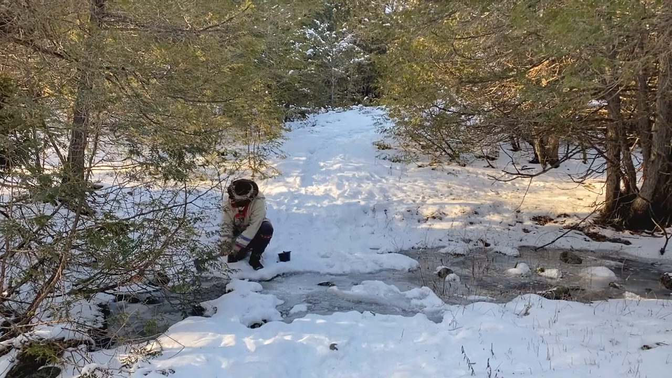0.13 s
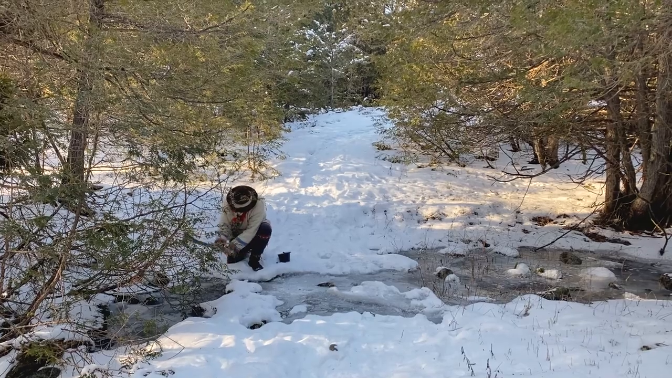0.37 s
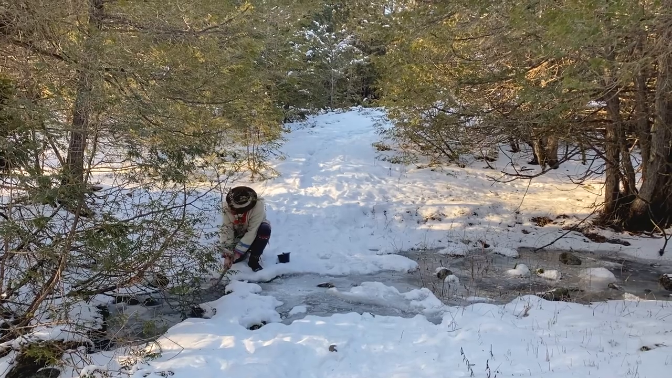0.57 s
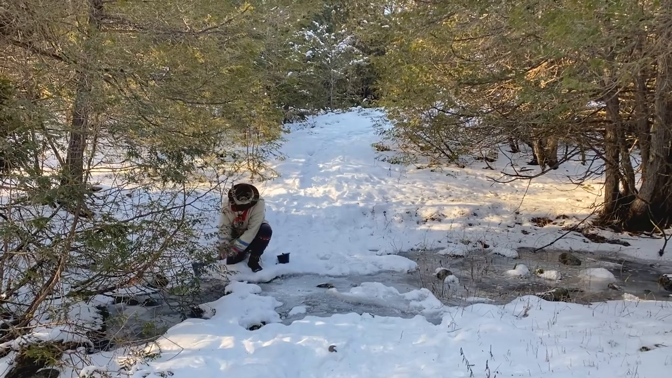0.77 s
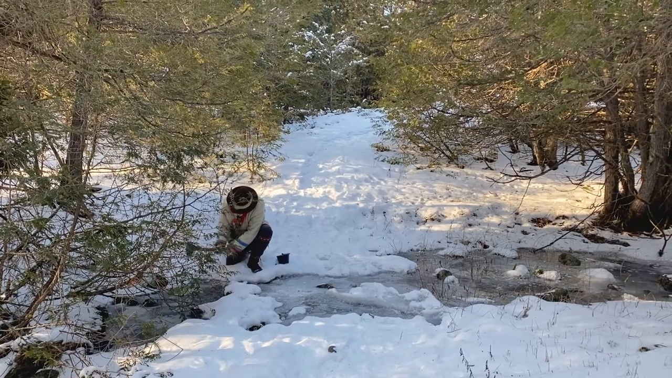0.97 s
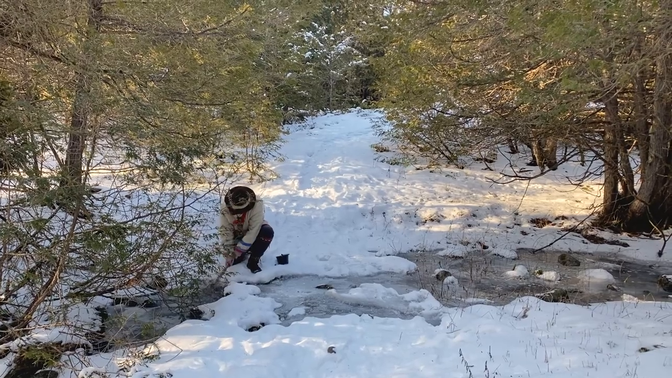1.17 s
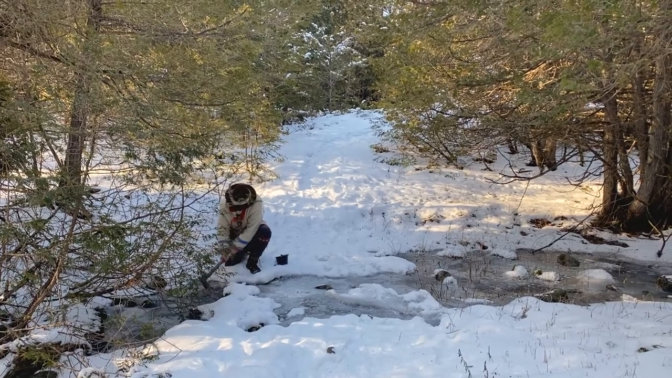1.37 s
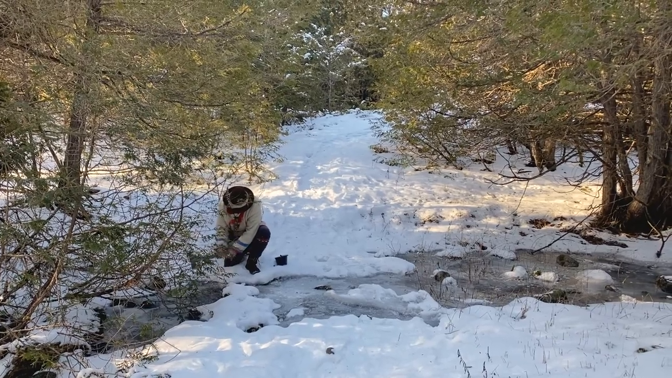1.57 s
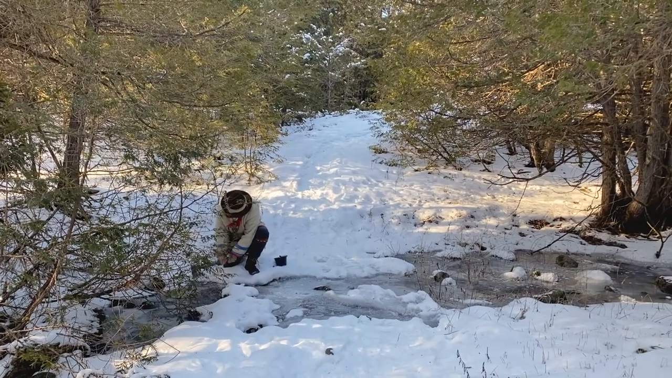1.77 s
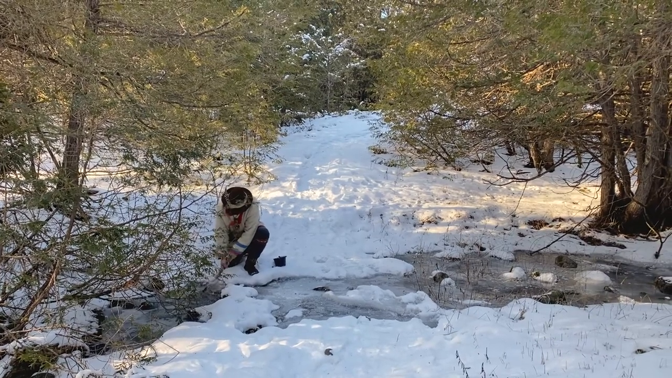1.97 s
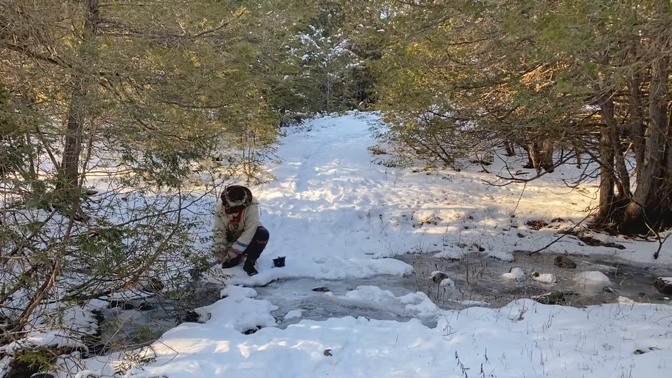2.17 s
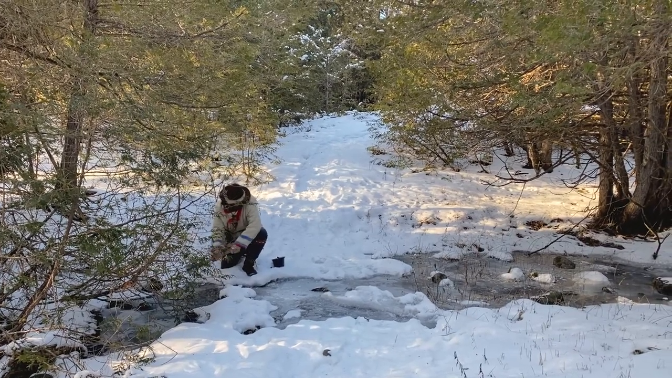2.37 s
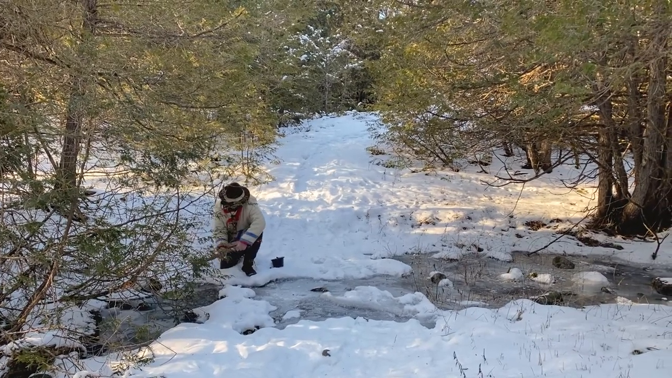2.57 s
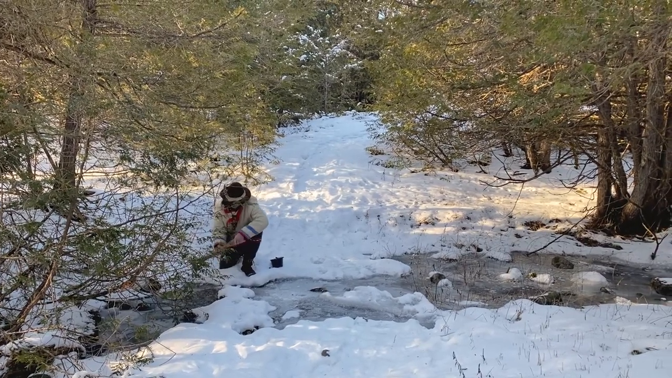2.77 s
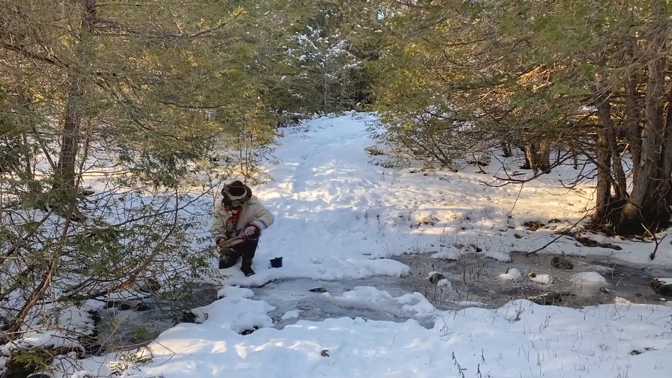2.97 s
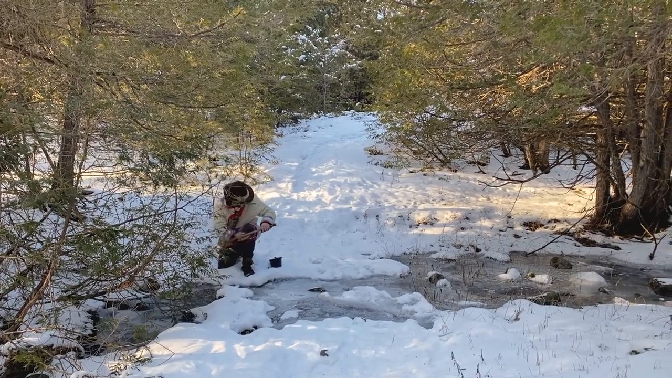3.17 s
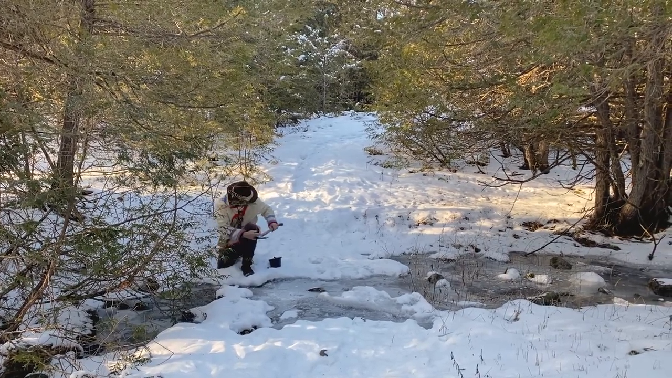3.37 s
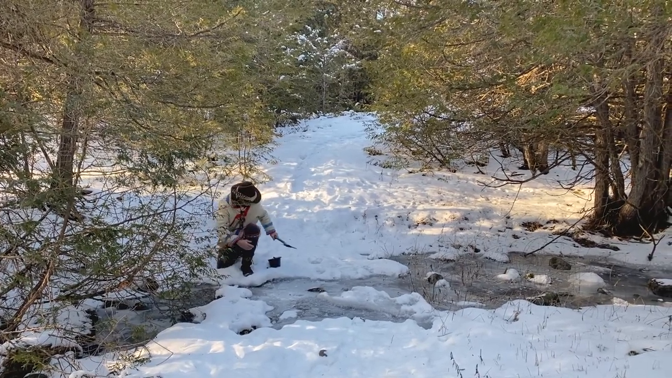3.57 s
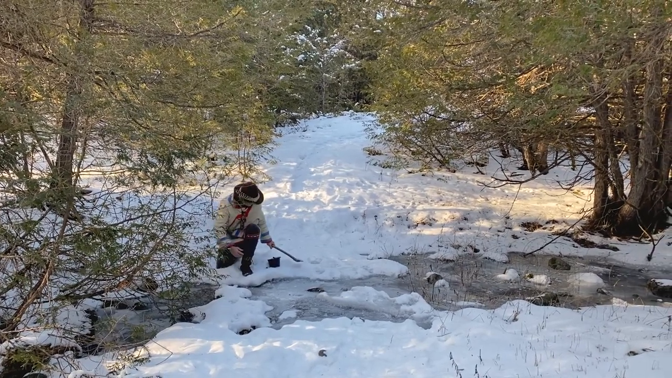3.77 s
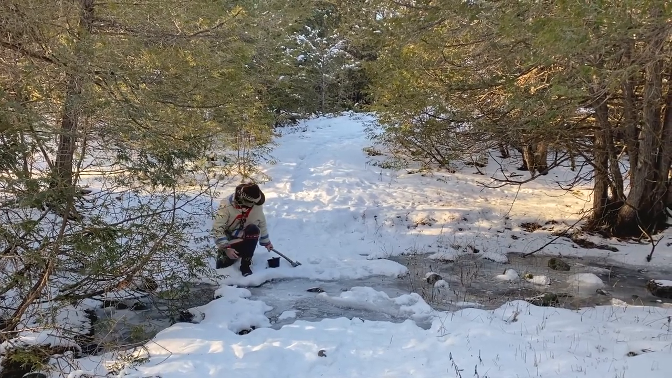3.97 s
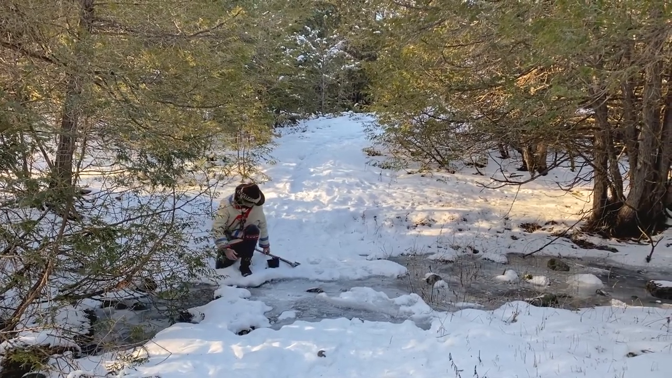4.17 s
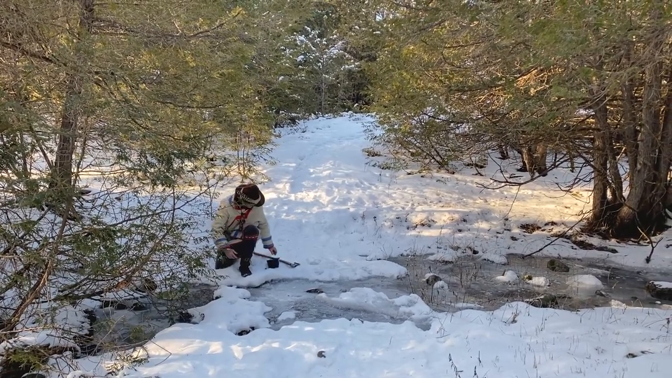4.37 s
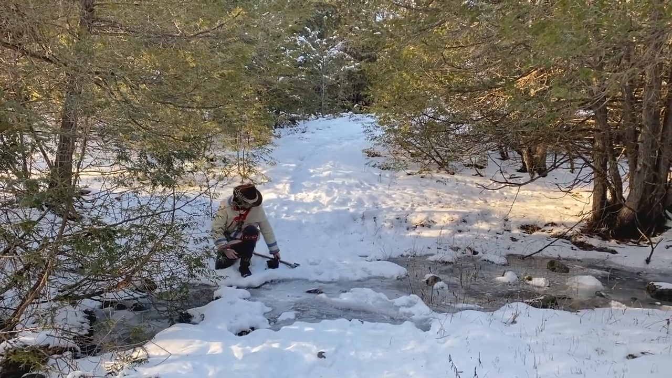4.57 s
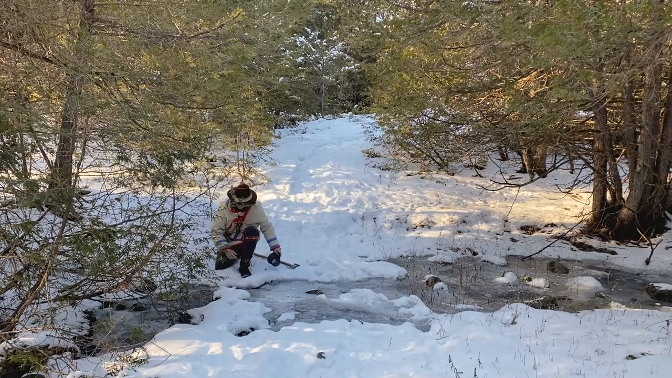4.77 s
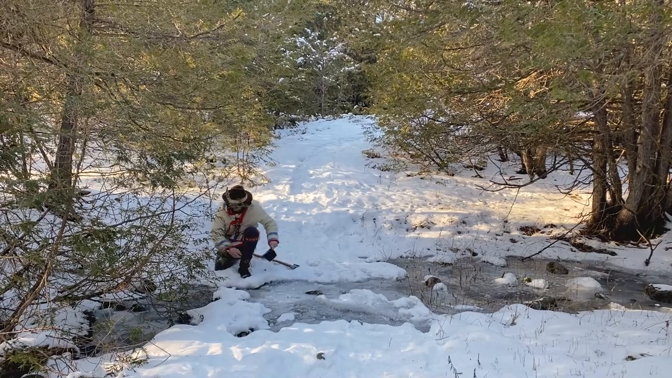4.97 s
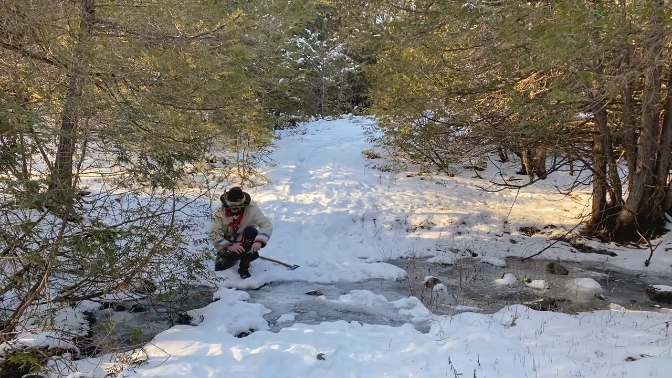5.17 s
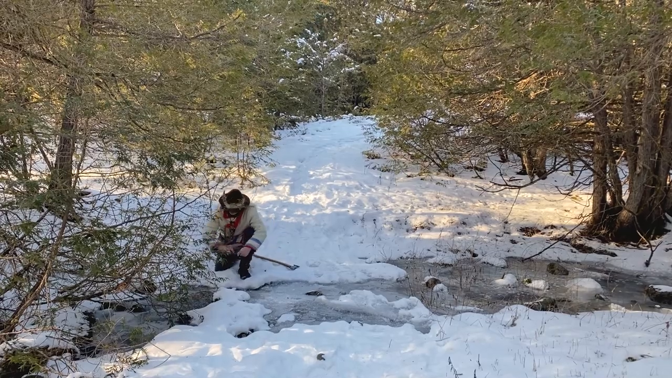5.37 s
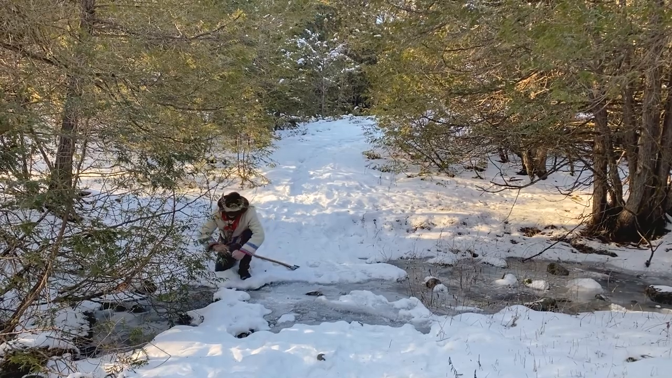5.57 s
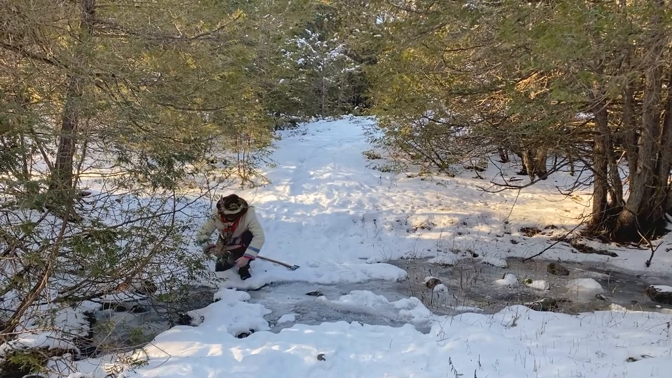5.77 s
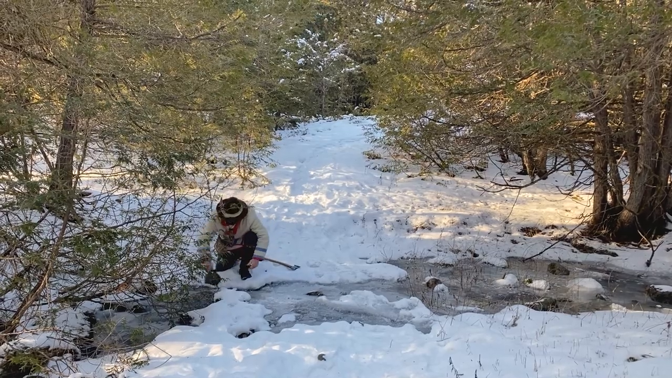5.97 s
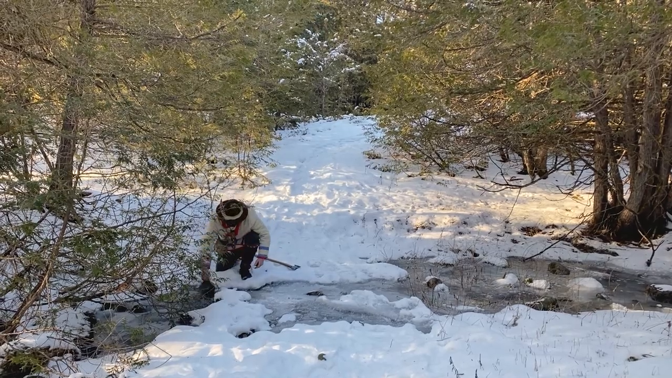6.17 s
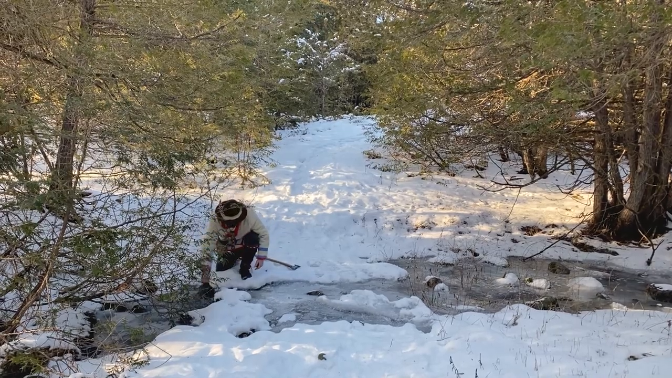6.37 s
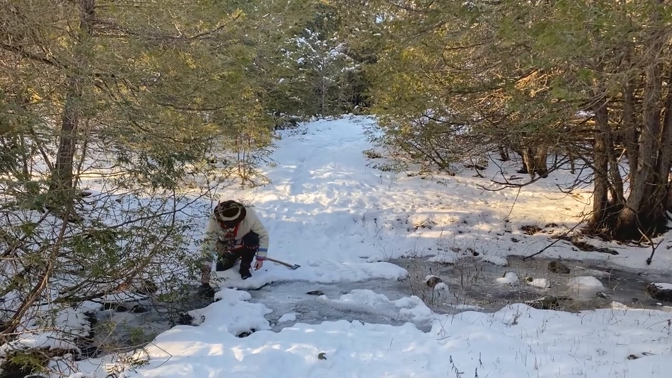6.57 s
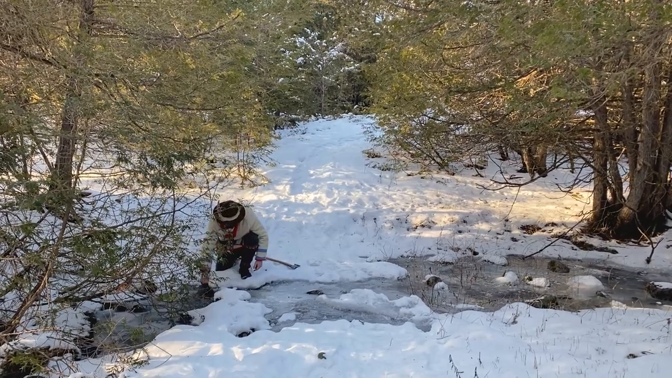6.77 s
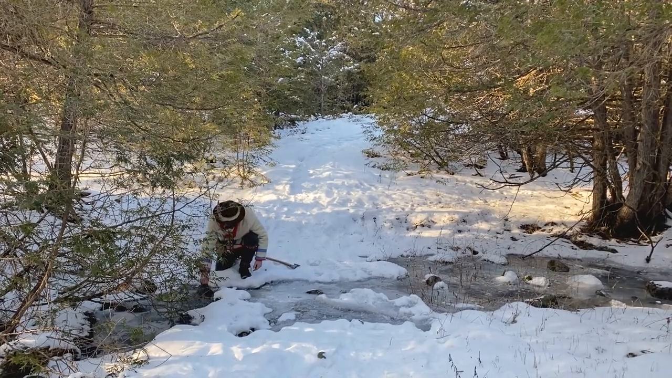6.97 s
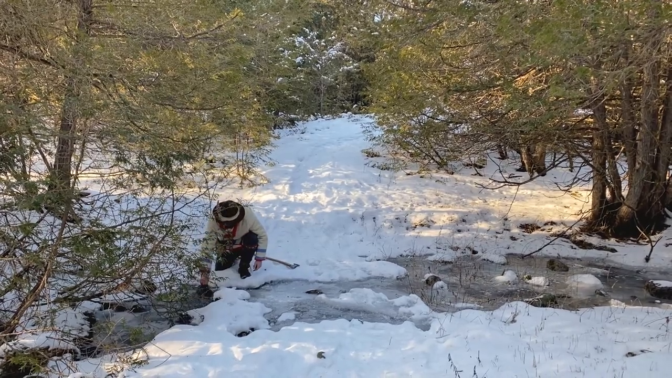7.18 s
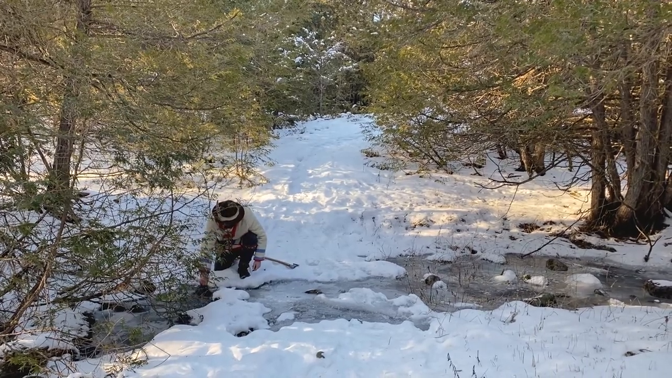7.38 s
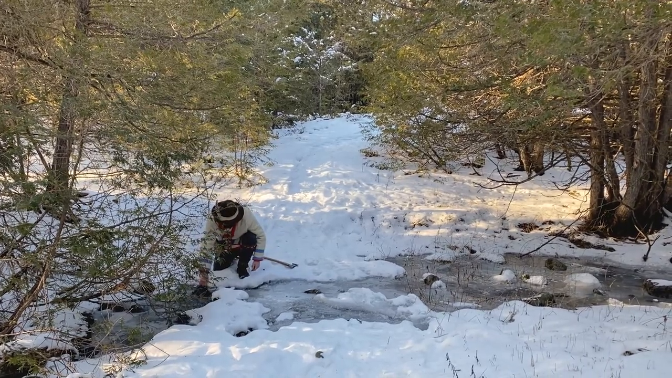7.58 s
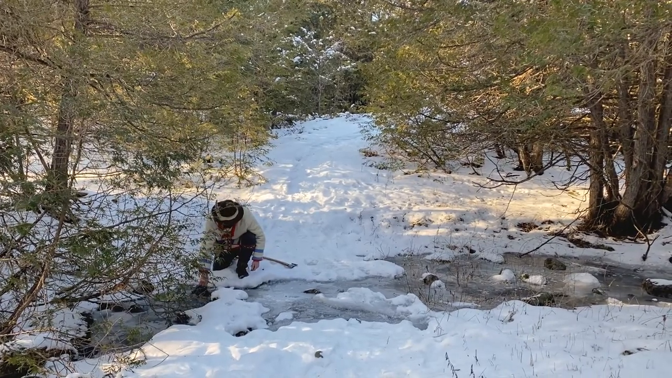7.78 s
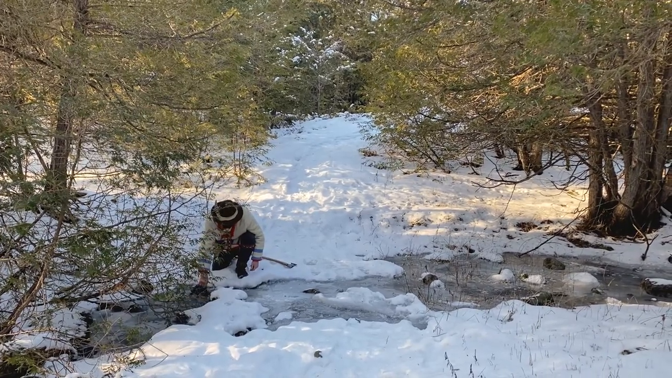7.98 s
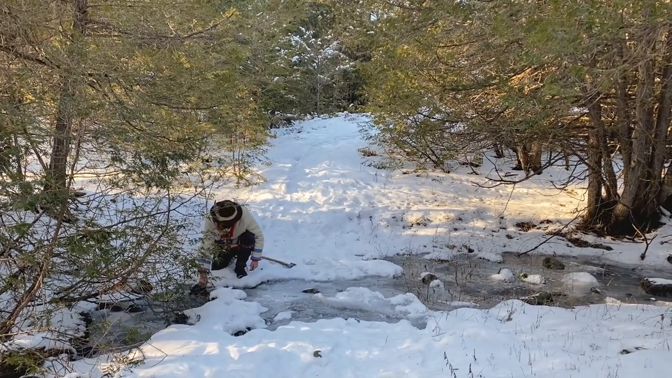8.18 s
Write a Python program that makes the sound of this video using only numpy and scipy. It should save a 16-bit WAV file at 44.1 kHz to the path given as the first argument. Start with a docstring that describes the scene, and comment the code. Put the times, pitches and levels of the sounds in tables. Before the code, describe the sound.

A hatchet chops thin creek ice three times with cracks, splashes and plops, then faint rustles and metal cup clinks over low wind.

```python
"""A hatchet chops thin ice on a winter forest creek three times: the sheet cracks, rings and booms,
water splashes back, and chips plop in, each trapping a bubble. A high rattle slows and stops. Then
clothes rustle, a metal cup clinks, lands on snow and is dipped, and snow crackles faintly under boots.
Wind rumbles on a pair of microphone ports and roars in far trees over a faint hiss; a low hum joins
halfway. Trunks and banks scatter the close sounds back."""
import sys
import numpy as np
from scipy import signal
from scipy.fft import rfft, irfft, next_fast_len
from scipy.io import wavfile
from scipy.ndimage import uniform_filter1d, map_coordinates

SR = 44100
rng = np.random.default_rng(int(sys.argv[2]) if len(sys.argv) > 2 else 0)


def int16_out(signal):
    """Quantize to a 16-bit WAV file."""
    q = np.round(np.clip(np.atleast_2d(signal).T, -1, 1) * 32767)
    wavfile.write(sys.argv[1], SR, q.astype(np.int16))


N = 363384


def amp(db):
    return 10 ** (np.asarray(db) / 20)


def unit(x):
    return x / np.sqrt(np.mean(x ** 2) + 1e-20)


def along(points, hz):
    """Read (hz, value) points on a log frequency axis."""
    freqs, values = np.transpose(points)
    return np.interp(np.log(hz + 1), np.log(freqs + 1), values)


def fader(points):
    """A level ride in dB through (time_s, level_db) points, silent outside them."""
    return np.interp(np.arange(N) / SR, *np.transpose(points), left=-150, right=-150)


def wobble(rate):
    """A smooth random curve, rate knots a second."""
    return map_coordinates(rng.standard_normal(int(N * rate / SR) + 4), [np.arange(N) * rate / SR])


def filtered(x, response):
    """x through a complex frequency response."""
    size = next_fast_len(x.shape[-1] + min(8192, x.shape[-1] // 3))
    return irfft(rfft(x, size) * response(np.fft.rfftfreq(size, 1 / SR)), size)[..., :x.shape[-1]]


def peak(hz, width_hz, order=1):
    """A resonant band-pass, applied order times."""
    return lambda f: (1j * f * width_hz / (hz * hz - f * f + 1j * f * width_hz + 1e-9)) ** order


def band(t, hz, width_hz, order=1):
    """Band-passed noise as long as t; rms 1."""
    return unit(filtered(rng.standard_normal(len(t)), peak(hz, width_hz, order)))


def add(track, start_s, sound):
    """Mix a sound in, cut at the end of the track."""
    slot = track[round(start_s * SR):][:len(sound)]
    slot += sound[:len(slot)]


def fade(t, rise_s, t60_s):
    """Quick attack, exponential decay."""
    return (1 - np.exp(-t / rise_s)) * amp(-60 * t / t60_s)


def dying(start_s, db, db_per_s, db_per_s2=0):
    """A gain that jumps up at start_s and then falls."""
    since = np.maximum(np.arange(N) / SR - start_s, 0)
    return (1 - np.exp(-since / 0.0025)) * amp(db - db_per_s * since - db_per_s2 * since ** 2)


def grains(count, samples, hz, spread, cycles, size_db):
    """Damped sines with a soft start at random moments, pitches and sizes; rms 1."""
    starts = (rng.random((count, 1)) * N).astype(int)
    chance = rng.standard_normal((count, 2))
    pitch_hz = np.clip(hz * np.exp(spread * chance[:, :1]), 300, 15000)
    turns = pitch_hz * np.arange(samples) / SR
    shape = np.sin(2 * np.pi * turns) * turns * np.exp(-turns / cycles) * amp(size_db * chance[:, 1:])
    at = starts + np.arange(samples)
    return unit(np.bincount(at.ravel(), shape.ravel(), N)[:N])


# Stereo image of diffuse noise (likeness 1 is mono): freq_hz, likeness
DIFFUSE_IMAGE = [(60, 0.57), (130, 0.24), (290, 1), (640, 0.032), (1410, 0.14), (3100, 0.24), (6820, 0.01),
                 (15000, 0.6)]

def rush(spectrum, patchy_db, image=DIFFUSE_IMAGE):
    """Shaped stereo noise with patches of random gain; its mid channel has rms 1."""
    bins = signal.stft(rng.standard_normal((2, N)), nperseg=512)[2]
    patches = uniform_filter1d(uniform_filter1d(rng.standard_normal(bins.shape[1:]), 6, 0), 8, 1)
    pair = signal.istft(bins * amp(patchy_db * unit(patches)), nperseg=512)[1][:, :N]
    angle = lambda hz: np.arccos(np.clip(along(image, hz), -1, 1)) / 2
    colour = lambda hz: amp(along(spectrum, hz)) * [np.cos(angle(hz)), np.sin(angle(hz))]
    mid, side = filtered(pair, colour)
    return np.array([mid + side, mid - side]) / mid.std()


# Tone of churned water: freq_hz, gain_db
GURGLE_EQ = [(150, -53.5), (250, -23), (426, -7), (807, -4.5), (1050, -4.5), (1270, -6.5), (2270, -8),
             (2510, -12), (4000, -21), (5200, -51.5), (8800, -120)]
# Tone of the spray: freq_hz, gain_db
SPRAY_EQ = [(1470, -31), (2500, -7.5), (3920, -2.5), (5110, 0.5), (7530, -9.5), (12600, -6.5),
            (16000, -16.5)]
# Stereo image of the spray: freq_hz, likeness
SPRAY_IMAGE = [(2500, .6), (6000, .3), (9000, 0.54), (13000, .9)]
# Water falling back: start_s, gurgle_db
SLOPS = [(0.649, -54), (1.292, -49), (1.945, -48)]
# A faint opening wash, then three blade hits: start_s, thump_db, gurgle_db, spray_db, mist_db
CHOPS = [(0.0, -67, -51.5, -62.5, -63), (0.495, -29, -43.5, -42.5, -57.5), (1.141, -40.5, -45, -43, -60.5),
         (1.819, -38, -41, -40, -58)]

def splashes():
    """Blade and cup churn the water: bubbles on noise below, fine spray above."""
    dip = cup_dip()
    churn = amp(-60) * dip + sum(dying(start_s, db, db_per_s=130) for start_s, db in SLOPS)
    shower = amp(-59) * dip
    for start_s, _, gurgle_db, spray_db, mist_db in CHOPS:
        churn += dying(start_s, gurgle_db, db_per_s=112)
        shower += dying(start_s, spray_db, db_per_s=160.5)
        shower += dying(start_s, mist_db, db_per_s=12, db_per_s2=21.5)  # mist hangs, then drops
    bubbles = grains(count=3000, samples=400, hz=1194, spread=.45, cycles=6.8, size_db=4.0)
    fizz = grains(count=8000, samples=160, hz=5460, spread=0.63, cycles=1.3, size_db=2.5)
    gurgle = .85 * bubbles + 0.61 * rush(GURGLE_EQ, patchy_db=1.0)
    spray = 0.62 * fizz + 0.64 * rush(SPRAY_EQ, patchy_db=1.5, image=SPRAY_IMAGE)
    return churn * amp(4.1 * wobble(35)) * gurgle + shower * amp(2.0 * wobble(45)) * spray


def thumps(end_hz=130, glide_s=0.0061):
    """Each chop pushes the water; the pitch dives, as bending waves bring the highs first."""
    out, t = np.zeros(N), np.arange(SR // 8) / SR
    turns = end_hz * (t + .014 * (1 - np.exp(-t / glide_s)))
    for start_s, thump_db, *_ in CHOPS:
        add(out, start_s, amp(thump_db) * fade(t, glide_s, .13) * np.sin(2 * np.pi * turns))
    return out


# Level ride of the rattle: time_s, level_db
RATTLE_RIDE = [(0.0, -56.5), (2.03, -59.5), (2.49, -62.5), (3.06, -63.5), (3.3, -69), (3.4, -86),
               (3.5, -100)]
# Its tempo: time_s, beats_per_s
RATTLE_TEMPO = [(0, 30.07), (.5, 27.64), (1.6, 26.21), (2.2, 22.8), (2.6, 23.49), (3.1, 19.73), (3.4, 7.71)]
# Its tone: freq_hz, gain_db
RATTLE_EQ = [(3820, -47), (6500, -13.5), (7030, -7), (7920, -13.5), (8690, -5.5), (8980, -1), (10100, -2),
             (10700, -3.5), (13500, -3.5), (14600, -8.5), (15800, -16)]
# Its stereo image: freq_hz, likeness
RATTLE_IMAGE = [(5000, .5), (9000, .7), (13000, .9)]

def rattle():
    """High hiss in beats that jump up and sag, slowing until the last one dies."""
    beats_per_s = np.interp(np.arange(N) / SR, *np.transpose(RATTLE_TEMPO))
    phase = (.3 + np.cumsum(beats_per_s) / SR) % 1
    throb = 0.35 + 1.2 * (1 - np.exp(-phase / .06)) * np.exp(-phase / 0.24)
    return amp(fader(RATTLE_RIDE)) * throb * rush(RATTLE_EQ, patchy_db=2.5, image=RATTLE_IMAGE)


# Level ride of the low rumble: time_s, level_db
RUMBLE_RIDE = [(0.0, -56), (0.64, -55.5), (0.8, -63.5), (0.99, -53.5), (1.05, -63), (1.17, -44),
               (1.28, -65), (1.33, -49.5), (1.67, -61.5), (1.74, -87), (1.88, -44.5), (1.97, -63),
               (2.66, -82), (2.71, -63), (3.26, -103), (3.95, -106), (4.13, -64.5), (4.29, -88.5),
               (4.36, -60.5), (4.61, -89.5), (4.86, -56), (6.22, -58.5), (7.57, -51.5), (7.85, -65),
               (7.89, -53), (8.24, -59)]
# Its tone: freq_hz, gain_db
RUMBLE_EQ = [(12, -46), (20, -18.5), (43, -6.5), (60, 7), (92, -3.5), (122, -5.5), (140, -10.5), (180, -35),
             (310, -120)]
# Its stereo image, nearly mono: freq_hz, likeness
RUMBLE_IMAGE = [(60, .88)]

def low_rumble():
    """Wind on the ports, plus the ice sheet's boom after the second and third chops."""
    gain = amp(fader(RUMBLE_RIDE) + 2.2 * wobble(12))
    return gain * rush(RUMBLE_EQ, patchy_db=1.0, image=RUMBLE_IMAGE)


# Level ride of the distant wind: time_s, level_db
ROAR_RIDE = [(0.0, -69), (1.1, -73), (1.31, -62.5), (1.63, -74.5), (3.92, -80), (4.86, -66.5), (5.83, -68),
             (6.79, -66), (8.24, -66.5)]
# Its tone: freq_hz, gain_db
ROAR_EQ = [(59, -33), (100, -9.5), (124, -13.5), (150, -3.5), (329, -10), (535, -19.5), (1500, -41.5),
           (1950, -73.5), (3300, -120)]

def far_roar():
    """Wind roars softly in far trees."""
    return amp(fader(ROAR_RIDE) + 0.37 * wobble(5.2)) * rush(ROAR_EQ, patchy_db=0.8)


# Tone of the hiss bed: freq_hz, gain_db
HISS_EQ = [(240, -35), (400, -4.5), (777, -3.5), (852, -7), (994, -7), (1440, -11), (2250, -12),
           (2470, -14.5), (4950, -14.5), (11600, -23), (16000, -33.5)]

def hiss():
    """A faint hiss lies under everything."""
    return amp(-76.5) * rush(HISS_EQ, patchy_db=2.5)


# Chips and drops landing in the water: start_s, level_db, pitch_hz
PLOPS = [(0.028, -46, 1210), (0.042, -41.5, 1200), (0.127, -42.5, 1105), (0.303, -50.5, 1230),
         (0.556, -34.5, 950), (0.571, -30.5, 682), (0.6, -38, 880), (0.61, -30.5, 853), (0.645, -23.5, 906),
         (0.68, -45.5, 1320), (0.736, -30, 1190), (0.783, -39.5, 1164), (0.864, -51.5, 972),
         (1.19, -42, 880), (1.227, -38, 790), (1.254, -32, 1180), (1.282, -41.5, 687), (1.303, -32.5, 1200),
         (1.328, -37, 1530), (1.417, -39.5, 1440), (1.874, -30.5, 640), (1.892, -29, 1500),
         (1.903, -31.5, 1030), (1.947, -37, 1015), (1.958, -30.5, 1060), (1.979, -39.5, 1060),
         (2.025, -36, 1476), (2.076, -36, 1540), (2.171, -47, 964), (2.269, -46.5, 1303)]

def plops(slap_db=-19.5):
    """Each chip or drop slaps the water and traps a bubble that rings briefly, its pitch rising."""
    out, t = np.zeros(N), np.arange(SR // 10) / SR
    for start_s, db, hz in PLOPS:
        bubble = fade(t, 0.0025, 38 / hz) * np.sin(2 * np.pi * hz * (.95 * t + 3 * t * t))
        slap = band(t, 2200, 2500) * fade(t, .001, 0.034)
        add(out, start_s, amp(db) * (bubble + amp(slap_db) * slap))
    return out


# Cracks in the ice sheet: start_s, high_db, high_hz, low_db, low_hz, treble_db
CRACKS = [(0.1023, -52.5, 1995, -58, 1090, -53.5), (0.4949, -20, 2286, -29.5, 616, -29),
          (0.5034, -26, 1457, -33, 773, -42), (0.5144, -39, 1676, -38, 1250, -39),
          (0.5199, -27.5, 2002, -30, 960, -41), (0.5383, -18.5, 2327, -17, 662, -40),
          (0.6016, -46.5, 2600, -31, 818, -41.5), (0.7732, -45.5, 1556, -52, 1210, -50),
          (1.1097, -36.5, 2225, -44, 509, -38.5), (1.1179, -29.5, 2024, -40.5, 1100, -36),
          (1.1261, -28, 1490, -32.5, 1050, -33), (1.1304, -24.5, 2070, -26, 977, -24.5),
          (1.141, -30, 2134, -28.5, 544, -35), (1.2637, -42, 1960, -48, 1210, -49),
          (1.8025, -34, 1400, -43.5, 1300, -29.5), (1.8071, -18, 1424, -28, 805, -31.5),
          (1.817, -22.5, 2037, -28, 845, -32.5), (1.8226, -21, 2119, -32.5, 1280, -33.5),
          (1.8361, -12, 2099, -27, 923, -37.5), (1.8372, -19, 1889, -18.5, 641, -32.5),
          (1.8424, -16, 2433, -21, 1110, -31.5), (1.8484, -24, 1819, -16.5, 907, -30)]

def ice_cracks(ping_db=-3, knock_db=2.5, sheen_db=-3):
    """Each crack rings a high and a low mode of the piece that breaks, and spits treble."""
    out, t = np.zeros(N), np.arange(SR // 8) / SR
    for start_s, high_db, high_hz, low_db, low_hz, treble_db in CRACKS:
        high_colour = lambda f: peak(1900, 2200)(f) * peak(high_hz, 1300, order=2)(f)
        high = unit(filtered(rng.standard_normal(len(t)), high_colour))
        low = band(t, low_hz, 900, order=2)
        spit = band(t, 5000, 5000, order=2)
        sheen = band(t, 12000, 8000, order=2)
        body = (amp(high_db) * high + amp(low_db) * low) * fade(t, 0.00068, 0.036)
        treble = amp(treble_db) * (spit + amp(sheen_db) * sheen) * fade(t, 0.00054, 0.043)
        ping = amp(high_db + ping_db) * fade(t, 0.00061, .022) * np.sin(2 * np.pi * high_hz * t)
        knock = amp(low_db + knock_db) * fade(t, 0.0007, .023) * np.sin(2 * np.pi * low_hz * t)
        add(out, start_s - .001, body + treble + ping + knock)
    return out


# Small snaps of crust: start_s, level_db, colour_hz
SNAPS = [(0.139, -46.5, 4570), (0.404, -51, 3260), (1.608, -44.5, 10510), (0.32, -53, 2460),
         (1.5033, -60, 2004), (2.12, -44.5, 4975), (3.0156, -53, 12120), (6.1719, -43.5, 4798),
         (6.2146, -48, 4230), (6.2263, -45.5, 3500), (6.7389, -71, 5210), (7.0718, -66.5, 3320),
         (7.1603, -59, 3390), (7.1755, -54.5, 8880), (7.3712, -65, 2730), (7.4106, -52, 11790),
         (7.8013, -64, 5770), (8.0397, -67, 5100)]

def crust_snaps():
    """Crust breaks in tiny, bright bursts of noise with a sharp attack."""
    out, t = np.zeros(N), np.arange(SR // 6) / SR
    for start_s, db, hz in SNAPS:
        colour = lambda f: peak(hz, .9 * hz, order=2)(f) + 0.12 * peak(9000, 12000)(f)
        snap = unit(filtered(rng.standard_normal(len(t)), colour))
        add(out, start_s, amp(db) * snap * fade(t, 0.00089, 0.03))
    return out


# EQ sweep on the roar and hiss: time_s, centre_hz, gain_db
SCOOP_SWEEP = [(2.38, 450, 1.5), (2.5, 680, -9.5), (2.75, 1450, -14.5), (3.0, 2190, -6), (3.08, 2500, -4.5)]

def scooped(bed):
    """A wide scoop climbs through the background and stays parked in the upper mids."""
    hz, t, bins = signal.stft(bed, SR, nperseg=1024)
    time_s, centre_hz, gain_db = np.transpose(SCOOP_SWEEP)
    octaves = np.log2((hz[:, None] + 1) / np.interp(t, time_s, centre_hz))
    scoop_db = np.interp(t, time_s, gain_db) * np.exp(-(octaves / 0.9) ** 4)
    return signal.istft(bins * amp(scoop_db), SR, nperseg=1024)[1][:, :N]


# Rubs of cloth and snow: start_s, hold_s, body_db, colour_hz, sheen_db, pat_db
RUSTLES = [(3.039, .045, -76, 4150, -76, -72.5), (3.338, .016, -89, 4550, -88.5, -75),
           (3.858, .018, -62.5, 6050, -63, -84.5), (4.22, .02, -61.5, 4703, -61.5, -71),
           (4.6, 0.045, -75, 3450, -90, -73), (5.049, .015, -86.5, 2615, -75.5, -69.5),
           (5.41, .018, -73, 4820, -77, -81), (6.135, .012, -57.5, 4130, -58.5, -66),
           (6.795, 0.018, -76.5, 3600, -85, -73), (6.937, .018, -73.5, 4500, -86, -80),
           (7.03, 0.02005, -78.5, 8960, -82.5, -86.5), (7.198, .025, -75, 4810, -73, -79.5),
           (7.328, 0.017, -73, 3160, -90, -77.5)]

def rustles(rise_s=0.0036, t60_s=.09):
    """Short gritty rubs rise, hold and die, each with its own colour over a low pat."""
    out, t = np.zeros(N), np.arange(SR // 6) / SR
    for start_s, hold_s, body_db, hz, sheen_db, pat_db in RUSTLES:
        stroke = (1 - np.exp(-t / rise_s)) * amp(-60 * np.maximum(t - hold_s, 0) / t60_s)
        grit = rng.standard_normal((3, len(t)))
        grit *= amp(2.0 * rng.standard_normal(len(t) // 40 + 1).repeat(40)[:len(t)])
        body = amp(body_db) * unit(filtered(grit[0], peak(hz, 1.1 * hz, order=2)))
        sheen = amp(sheen_db) * unit(filtered(grit[1], peak(12500, 7000, order=2)))
        pat = amp(pat_db) * unit(filtered(grit[2], peak(400, 730)))
        add(out, start_s - .004, (body + sheen + pat) * stroke)
    return out


# Level ride of the hum: time_s, level_db
HUM_RIDE = [(4.5, -94.5), (4.9, -57.5), (6.6, -64.5), (7.4, -58), (8.24, -64.5)]

def hum(pitch_hz=120):
    """A low tone wavers in pitch and level."""
    turns = pitch_hz * np.arange(N) / SR + 0.081 * wobble(27)
    return amp(fader(HUM_RIDE) + 3.3 * wobble(7.3)) * np.sin(2 * np.pi * turns)


# Short swelling tones: start_s, level_db, pitch_hz, swell_s
SWELLS = [(4.57, -64.5, 2970, 0.0039), (4.585, -66.5, 1100, 0.017), (4.6, -72, 3490, 0.0073),
          (4.675, -77.5, 3520, .005), (4.62, -61.5, 1580, 0.0057), (4.665, -73, 2530, 0.011),
          (5.405, -74.5, 4850, .01), (5.56, -71.5, 4700, 0.0043), (6.152, -47, 790, 0.018),
          (6.17, -44, 4500, 0.0013), (6.185, -54.5, 930, 0.022), (6.205, -45.5, 630, 0.0079),
          (6.235, -50.5, 930, 0.013), (6.24, -60.5, 630, 0.01), (7.96, -69.5, 4540, 0.0043)]

def swelling_tones():
    """Slightly rough notes: faint squeaks, and the cup ringing or bubbling as it is dipped."""
    out, t = np.zeros(N), np.arange(SR // 5) / SR
    for start_s, db, hz, swell_s in SWELLS:
        note = np.sin(2 * np.pi * hz * t) + 0.41 * band(t, hz, 0.068 * hz)
        add(out, start_s, amp(db) * note * t / swell_s * np.exp(1 - t / swell_s))
    return out


# Modes of the metal cup: pitch_hz, gain_db, t60_s
CUP_MODES = [(635, 11.5, 0.032), (795, -4, 0.26), (1090, -4.5, 0.092), (1660, -3, 0.065), (1913, 4, 0.055),
             (2234, -15, 0.12), (3180, -32, 0.048), (3740, -18, 0.087)]
# Contacts with the cup: start_s, knock_db, knock_hz, tick_db, ring_db
CLINKS = [(4.573, -63, 1100, -67.5, -75.5), (4.723, -68.5, 630, -53.5, -65.5), (4.764, -68, 622, -71, -73),
          (4.808, -59, 596, -65, -73), (4.87, -72.5, 638, -55.5, -69.5), (5.26, -53.5, 673, -68, -67),
          (5.629, -63.5, 1110, -80, -72), (5.702, -47.5, 1870, -57.5, -52)]

def cup_clinks(landing_s=4.808, thud_db=-43):
    """Each contact knocks, ticks and rings the hand-damped metal; once the cup thuds on packed snow."""
    out, t = np.zeros(N), np.arange(SR // 3) / SR
    for start_s, knock_db, knock_hz, tick_db, ring_db in CLINKS:
        ring = sum(amp(db + rng.normal(0, 1.6)) * fade(t, 0.00089, t60_s) * np.sin(2 * np.pi * hz * t)
                   for hz, db, t60_s in CUP_MODES)
        knock = band(t, knock_hz, 1000, order=2) * fade(t, 0.0005, 0.033)
        tick = band(t, 3860, 2900) * fade(t, 0.00088, 0.068)
        add(out, start_s, amp(ring_db) * ring + amp(knock_db) * knock + amp(tick_db) * tick)
    thud = band(t, 190, 330, order=2) * fade(t, 0.0012, 0.095)
    add(out, landing_s, amp(thud_db) * thud)
    return out


def cup_dip(peak_s=6.175, hold_s=0.0536, rise_db_per_s=451, fall_db_per_s2=902):
    """Envelope of the water stirred by the dipped cup: a fast swell, a hold, an ever steeper fall."""
    t = np.arange(N) / SR
    before, after = np.maximum(peak_s - t, 0), np.maximum(t - peak_s - hold_s, 0)
    return amp(-rise_db_per_s * before - fall_db_per_s2 * after ** 2)


# Level ride of the snow underfoot: time_s, level_db
CRACKLE_RIDE = [(6.4, -110), (6.75, -91), (7.4, -88), (8.24, -96)]

def snow_crackle():
    """Snow gives under the boots in sparse, tiny grains of unequal size."""
    gain = amp(fader(CRACKLE_RIDE) + 4.02 * wobble(12))
    return gain * grains(count=1500, samples=160, hz=5500, spread=0.74, cycles=1.6, size_db=5)


# Decay of the forest reverb: freq_hz, t60_s
FOREST_DECAY = [(200, 0.58), (1500, .5), (5000, 0.29), (12000, 0.17)]

def forest_reverb(x):
    """Trunks and banks scatter the sound back, each frequency dying at its own speed."""
    hz, t, bins = signal.stft(rng.standard_normal((2, SR // 2)), SR, nperseg=256)
    tail = signal.istft(bins * amp(-60 * t / along(FOREST_DECAY, hz)[:, None]), SR, nperseg=256)[1]
    predelayed = np.pad(x, (300, 0))[None]
    return signal.fftconvolve(predelayed, tail / np.linalg.norm(tail[0]), axes=1)[:, :N]


# Level difference between the ports: freq_hz, left_over_right_db
PORT_BALANCE = [(60, -0.5), (110, 0.5), (200, 1), (380, 2), (700, 10), (1290, 10), (2380, -1), (4400, -4.5),
                (8120, -10.5), (15000, 2.5)]
# Phase difference between the ports: freq_hz, left_lead_rad
PORT_PHASE = [(0, 0), (520, 1.1), (1030, -.2), (1640, .5), (2410, 0), (3880, .3), (5430, -1), (6300, -2.1),
              (9200, -1.7), (12000, -.1), (16400, 0)]

def ports(x):
    """The two ports hear a source at the left, each with its own level and phase."""
    left = lambda hz: amp(along(PORT_BALANCE, hz) / 2) * np.exp(.5j * along(PORT_PHASE, hz))
    return filtered(x, lambda hz: np.array([left(hz), 1 / left(hz)]))


def scene():
    """Close sounds with a little reverb, plus dry water, rattle, low end and background."""
    close = ice_cracks() + thumps() + plops() + cup_clinks() + swelling_tones()
    close += rustles() + crust_snaps() + snow_crackle()
    level_pan = lambda hz: amp(np.array([[.5], [-.5]]) * along(PORT_BALANCE, hz))
    water = filtered(splashes(), level_pan)
    foreground = ports(close) + amp(-14.5) * forest_reverb(close) + water + rattle()
    rumble, roar = low_rumble(), far_roar()
    low_end = (rumble + hum()) * amp([[.8], [-.8]])  # leans slightly left
    return foreground + low_end + scooped(roar + hiss())


def record(dry, top_hz=15850):
    """A brick-wall low-pass trims the very top."""
    return filtered(dry, lambda hz: hz < top_hz)


dry = scene()
out = record(dry)
int16_out(out)
```